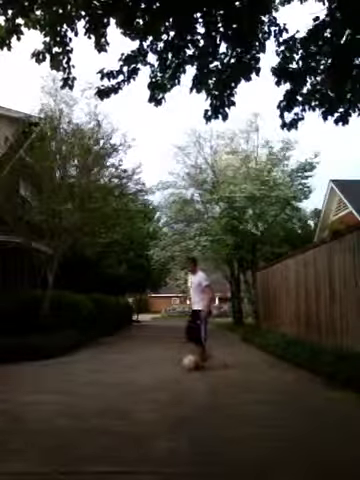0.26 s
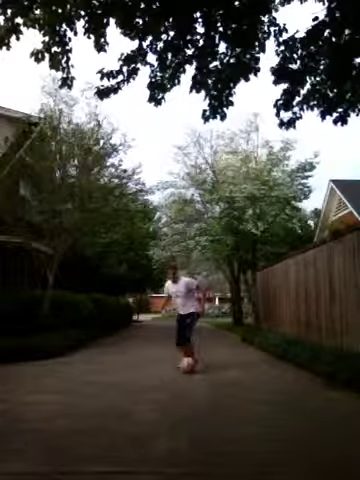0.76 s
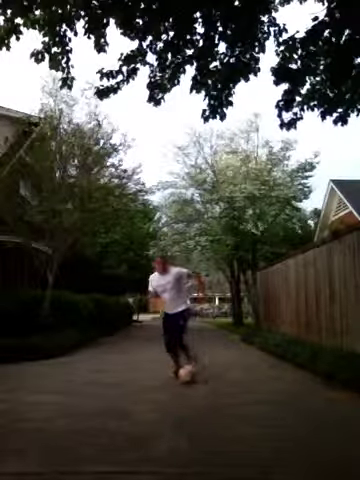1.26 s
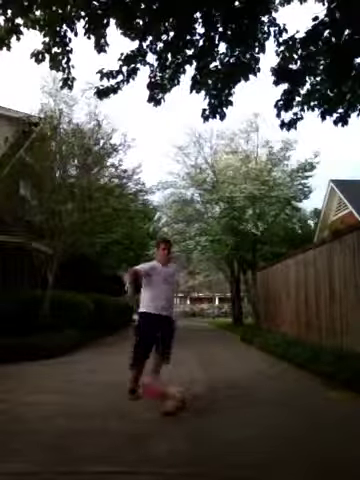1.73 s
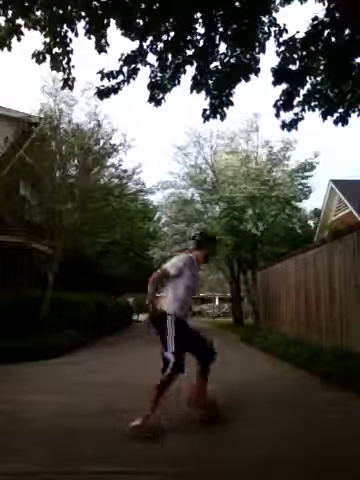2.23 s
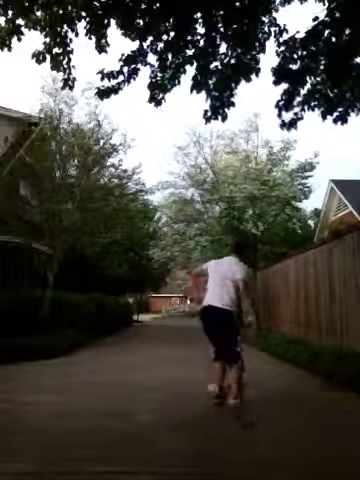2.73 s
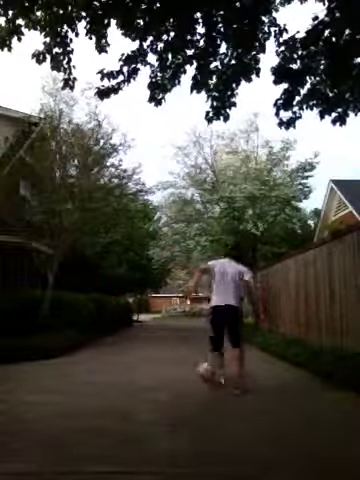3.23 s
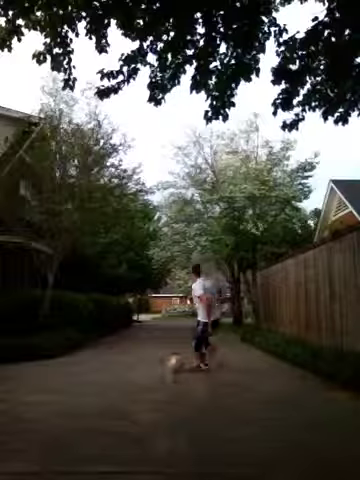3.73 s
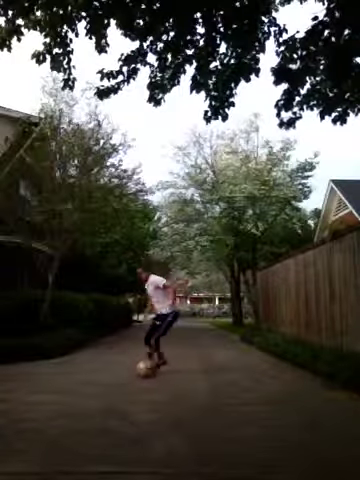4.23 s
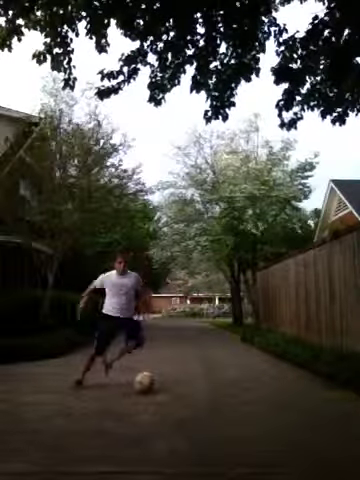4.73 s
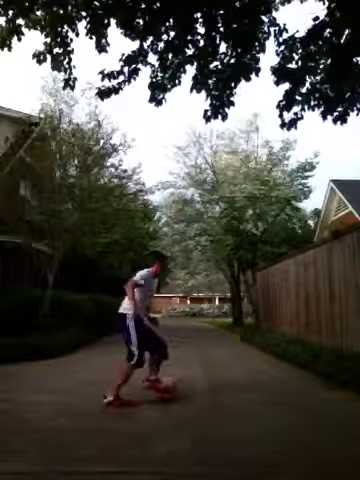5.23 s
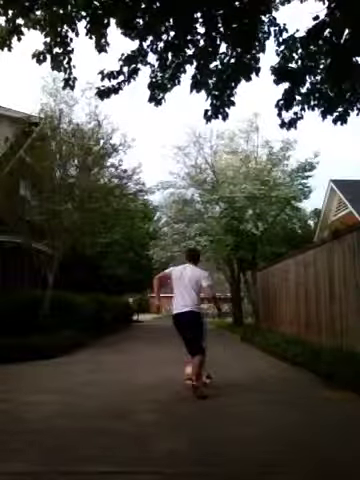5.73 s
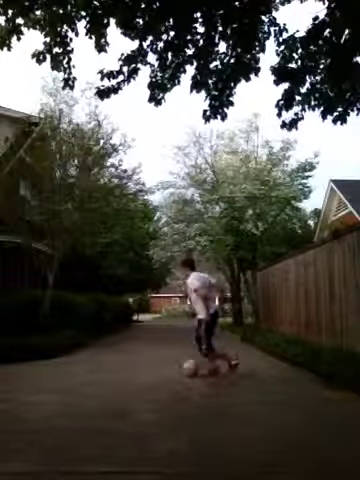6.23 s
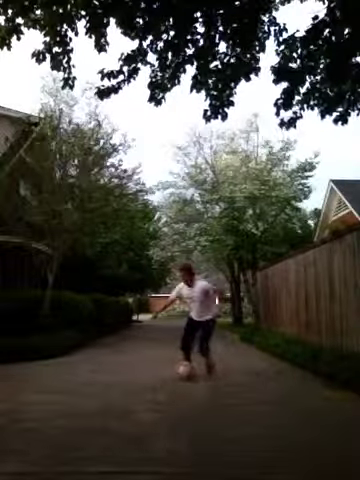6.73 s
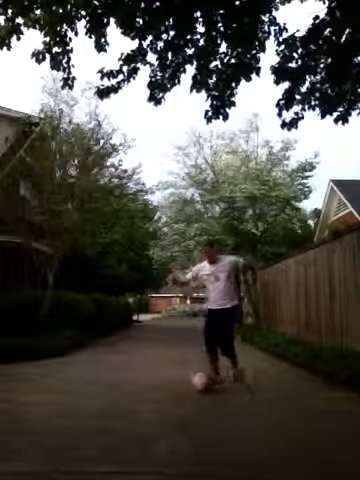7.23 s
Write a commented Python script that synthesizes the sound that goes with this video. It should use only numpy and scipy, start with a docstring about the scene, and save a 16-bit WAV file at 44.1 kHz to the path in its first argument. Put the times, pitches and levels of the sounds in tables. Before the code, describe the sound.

Outdoors on a driveway, a soft steady wash of distant traffic and leaves lies under everything. At about 0.2 s a pebble snaps brightly; faint scuffs and dull ball taps follow until 1.3 s. From 1.4 s footfalls and crisp gritty scrapes quicken, with a small chirp, and a strong hollow ball knock at 1.9 s. A sharp short shoe chirp sounds at 2.1 s, then softer steps and dragging grit. Around 3.6 to 3.9 s come thuds, chirps and a hard skid spraying hissing sand. Ball knocks at 4.5 and 5.0 s mix with firm steps, a thin faint squeal at 4.8 s, a chirp at 5.2 s and sliding scuffs. A solid step lands near 6.2 s; lighter taps follow, ending with ball touch, scrapes and two quick chirps by 7.4 s. Fence and walls echo faintly; the small microphone has thin bass.

```python
"""Short dull thuds of shoes and ball on an asphalt driveway, gritty scuffs, now and then a chirp or squeal.
A player dribbles a soccer ball up and down between a house and a wooden fence.
Thuds are damped modes, scuffs are shaped random clicks, chirps are tone bursts, squeals and sand are noise.
Fence and walls return a faint echo (convolution), over a quiet, steady outdoor wash of noise."""
import sys
import numpy as np
from scipy import signal
from scipy.fft import rfft, irfft
from scipy.io import wavfile

SR = 44100
rng = np.random.default_rng(int(sys.argv[2]) if len(sys.argv) > 2 else 0)


def transcribe(signal):
    """Save signal, clipped to [-1, 1], as a 16-bit WAV file at the path in sys.argv[1]."""
    frames = np.atleast_2d(signal).T
    limited = np.clip(frames, -1, 1)
    pcm = np.round(limited * 32767).astype(np.int16)
    wavfile.write(sys.argv[1], SR, pcm)


N = 328986
TIME = np.arange(N) / SR

# foot taps the ball: (time [s], knock level [dB], slap re knock [dB])
BALL_TOUCHES = [(0.427, -46, -8), (.75, -42.5, -8.5), (0.9304, -38.5, -9), (1.2129, -46.5, -4),
                (1.676, -36.5, -11), (1.8895, -22.5, -22), (2.3561, -30, -18), (2.7148, -38, -4.5),
                (3.6841, -32.5, -6.5), (3.7172, -38.5, -7), (4.5087, -27, -11), (4.9967, -25.5, -22.5),
                (5.003, -35, -6.5), (5.2981, -40.5, -3.5), (5.4244, -38.5, -10), (6.7035, -46.5, -16),
                (6.9644, -39, -11), (7.2665, -34, -2.5)]
# shoe lands: (time [s], knock level [dB], weight re knock [dB], slap re knock [dB])
FOOTFALLS = [(0.4352, -50, 3, -9), (.793, -49.5, -7, 9.5), (1.3499, -46, 10.5, 4.5),
             (1.4353, -32, -8.5, -0.5), (1.6646, -39.5, 4, -12), (1.8389, -36, 3.5, 2),
             (2.096, -36, -4.5, -0.5), (2.122, -33.5, -2, 0.5), (2.2652, -40.5, 3, 5),
             (2.5511, -38.5, -2, 2), (2.7988, -33.5, -0.5, -1), (3.0762, -48, 8.5, 3),
             (3.2174, -37, -1.5, -3), (3.2958, -49.5, 9, 3.5), (3.4792, -42.5, 0, 2), (3.624, -33, -2.5, 1),
             (3.691, -37, 4.5, 1), (3.8505, -32.5, 0.5, -5), (4.0145, -43, 3, -3.5), (4.0811, -36.5, 0, -3),
             (4.3055, -38, 4, 6), (4.318, -47, 13.5, 2), (4.445, -37, -6, 0.5), (4.5504, -46.5, 0, 4),
             (4.7505, -38, -4, -1), (4.9372, -25.5, -2.5, -5), (5.186, -38, -11, -3),
             (5.2065, -37.5, -3.5, 1.5), (5.218, -34.5, 1.5, 1), (5.4334, -44, -17, -4),
             (5.621, -39.5, -8, -4), (5.834, -46, 0, -7), (6.1357, -38.5, 1.5, 5),
             (6.1775, -27.5, -0.5, -9), (6.4125, -43, -0.5, -2.5), (6.6043, -41.5, 2.5, 1.5),
             (7.1879, -46.5, 2.5, -6)]
CONTACT_GAIN_DB = -0.5   # on all knock levels above, in the thuds only


def from_db(db):
    """Decibels to amplitude factor."""
    return 10 ** (np.asarray(db) / 20)


def rms_one(x):
    """The same sound at rms 1."""
    return x / np.sqrt(np.mean(x ** 2) + 1e-20)


def at_hz(points, hz, axis=1):
    """One column of a table, read on a log-frequency axis."""
    points = np.array(points)
    return np.interp(np.log(np.maximum(hz, 1)), np.log(points[:, 0]), points[:, axis])


def coloured(x, spectrum):
    """A steady excitation shaped by a spectrum; rms 1."""
    hz = np.arange(N // 2 + 1) * SR / N
    return rms_one(irfft(rfft(x) * from_db(at_hz(spectrum, hz)), N))


def bandpass(x, low_hz, high_hz):
    """Butterworth band-pass."""
    return signal.sosfilt(signal.butter(2, [low_hz, high_hz], "band", fs=SR, output="sos"), x)


def add(out, s, sound):
    """Mix a sound in from time s on."""
    start = max(round(s * SR), 0)
    out[start:start + len(sound)] += sound[:max(N - start, 0)]


def drift(knots_per_s):
    """A random wander, straight lines between normal draws of spread 1."""
    knots = rng.standard_normal(N // 20)
    return np.interp(TIME * knots_per_s, np.arange(len(knots)), knots)


def grains(per_s, spread_db):
    """Random clicks of uneven size and either sign."""
    sizes = from_db(spread_db * np.minimum(rng.exponential(1, N), 4))
    signs = rng.choice([-1, 1], N)
    return sizes * signs * (rng.random(N) < per_s / SR)


def air(level_db=-54.3):
    """Distant traffic and leaves: a soft, steady wash of shaped noise."""
    # wash spectrum: (frequency [Hz], relative density [dB])
    air_spectrum = [(15, -69), (25, -33), (59, -10), (84, -8.5), (126, -4), (227, -1), (267, -3), (389, -2),
                    (537, -5.5), (703, -4.5), (1080, -12.5), (1170, -10.5), (4500, -24.5), (13900, -28),
                    (15500, -36.5)]
    return from_db(level_db) * coloured(rng.standard_normal(N), air_spectrum)


def strokes(rise_share=0.49):
    """Every rub as (s, dB, rise s, fall s, fine dB, honk dB): brushes, catches of slides, crushes of contacts."""
    # sole brushes grit once:
    # (time [s], grit level [dB], length [s], fine re coarse grit [dB], honky mid band re grit [dB])
    brushes = [(0.039, -58.5, .019, 10, 1), (.115, -61, .015, 7, -8), (0.439, -52, 0.013, 5, 4.5),
               (0.916, -48, 0.013, 12, 10.5), (1.222, -58, 0.011, 6, 6), (1.373, -31.5, 0.018, 7.5, -5.5),
               (1.446, -32.5, .018, 5, 1), (1.507, -42, 0.012, 4.5, 4), (1.582, -36, 0.013, 5, -2.5),
               (1.646, -42.5, .013, 3, 2), (1.707, -50, 0.016, -4, 0.5), (1.768, -52, 0.019, 1, -0.5),
               (1.856, -34.5, .017, 1, -2.5), (1.897, -50.5, .02, 7, 13.5), (1.984, -50.5, 0.011, 2, -3),
               (2.117, -37.5, 0.029, -1, 2.5), (2.561, -40, 0.02, -8.5, 1.5), (2.612, -56, .018, -3, -1),
               (2.754, -55, 0.062, -3, -8), (2.799, -45.5, 0.011, -11, -2.5), (3.015, -56.5, 0.0075, 10, 7),
               (3.385, -54, 0.017, -4.5, 0), (3.486, -49.5, 0.017, 9, 7), (3.64, -38, 0.012, 1.5, 8.5),
               (3.812, -48, 0.012, 2, -3), (3.858, -30, 0.023, 5.5, 4), (4.091, -47, 0.0099, 15, -18),
               (4.107, -39.5, 0.014, 6, 3.5), (4.2, -49.5, 0.015, 1.5, 7.5), (4.309, -53, 0.019, 1, -8),
               (4.671, -54.5, .021, 1, 4.5), (4.705, -54, 0.011, 4, 3), (4.778, -39, 0.031, -1, -0.5),
               (4.82, -48.5, 0.063, -15, -11.5), (4.951, -41.5, .02, 4, -3), (5, -56, .02, 5, 2),
               (5.055, -47.5, .025, 4.5, 3.5), (5.189, -38.5, 0.017, 3, 6),
               (5.214, -36.5, 0.025, -0.5, 2.5), (5.519, -48.5, 0.052, 7, -3.5),
               (5.631, -42.5, 0.016, -4, 3.5), (6.115, -53.5, 0.021, -10, 0.5),
               (6.152, -41.5, 0.011, -2, 5), (6.17, -42, 0.037, -2, 5), (6.331, -51, 0.0063, 2, 12),
               (6.459, -46, 0.017, -1, -0.5), (6.63, -53.5, 0.034, 7, -7), (6.685, -49.5, 0.016, 4, -8),
               (6.75, -42.5, 0.016, 6.5, 4), (6.8, -44, .018, 9, -4.5), (7.189, -44.5, 0.0045, 0, 14.5),
               (7.204, -36.5, 0.018, 12, 3.5), (7.242, -47, 0.036, 1, -7), (7.31, -41, 0.012, 2.5, 3.5),
               (7.374, -42.5, 0.015, 4.5, 5), (7.414, -35, 0.02, 2, 11), (7.432, -35.5, .013, -2, 3.5)]
    # sole slides on, catching repeatedly:
    # (start [s], end [s], catch interval [s], grit level [dB], fine re coarse grit [dB])
    slides = [(0.809, .93, .033, -41.5, 7), (2.325, 2.455, 0.0363, -49, -1), (2.834, 2.96, 0.033, -52, 0),
              (3.243, 3.34, .028, -47, 1.5), (4.51, 4.635, 0.0498, -44, 4), (5.323, 5.475, 0.045, -40, 3)]
    catch_s, catch_honk_db = 0.02, 0.5
    catches = []
    for start, end, every, db, fine_db in slides:
        for s in np.arange(start, end, every):
            catches.append((s, db, catch_s, fine_db, catch_honk_db))
    rubs = [(s, db, rise_share * length, (1 - rise_share) * length, fine_db, honk_db)
            for s, db, length, fine_db, honk_db in brushes + catches]
    # each contact crushes a little grit
    crush_re_slap_db, crush_fine_db, crush_honk_db = -10.5, -4.5, 2
    crush_lag_s, crush_rise_s, crush_fall_s = 0.002, 0.0013, 0.01
    crushes = [(s + crush_lag_s, db + slap_db + crush_re_slap_db,
                crush_rise_s, crush_fall_s, crush_fine_db, crush_honk_db)
               for s, db, *_, slap_db in FOOTFALLS + BALL_TOUCHES]
    return rubs + crushes


def grit_ticks(per_s=9000, spread_db=-0.5, patchy_db=3.5, patches_per_s=110):
    """Grit ticks from three shared click streams, each band swelling and fading in its own patches."""
    ticks = [grains(per_s, spread_db) for _ in range(3)]
    edges_hz = np.geomspace(900, 17000, 17)
    out = np.zeros(N)
    for k, (low, high) in enumerate(zip(edges_hz, edges_hz[1:])):
        band = bandpass(ticks[k % len(ticks)], low, high)
        out += band * from_db(patchy_db * drift(patches_per_s))
    return out


def judder(depth_db=2.04, bumps_per_s=260):
    """A sliding sole bumps over rough asphalt, so its whole sound flutters; gain of rms 1."""
    return rms_one(from_db(depth_db * drift(bumps_per_s)))


def scuffs(rise_shape=1.68, fall_shape=0.86):
    """Each stroke swells and fades: grit crunches, sand hisses, the mid band honks and the heel rumbles."""
    # loose sand under the shoes: (time [s], level re grit before the fineness term [dB])
    loose_sand = [(0, -7), (1.4, -8), (2.1, -9), (2.6, -14), (2.95, -1.5), (3.35, -5.5), (3.65, -6.5),
                  (4.2, -4), (4.9, -5), (5.6, -10.5), (6.15, -1.5), (6.5, -1.5), (6.8, -12), (7.46, -11)]
    # spectra of the five parts: (frequency [Hz], relative density [dB])
    coarse_spectrum = [(900, -16), (1950, -5.5), (2550, 6.5), (3100, 4), (4000, 0.5), (5000, -20),
                       (8000, -62)]
    fine_spectrum = [(3000, -31), (4300, 2.5), (5000, 2.5), (5900, 5.5), (7200, 0), (8400, 0.5),
                     (9600, -12.5), (15000, -74)]
    sand_spectrum = [(6000, -36), (8500, 0.5), (9800, -5.5), (11300, -1), (12500, -2.5), (14000, -7),
                     (15500, -7)]
    honk_spectrum = [(700, -37), (1030, -13.5), (1280, -8.5), (1450, -2), (1650, -6), (1950, -15.5),
                     (2800, -37)]   # near 1.4 kHz, probably the microphone ringing
    drag_spectrum = [(60, -21), (150, -13.5), (280, -4), (400, -3.5), (520, 2.5), (660, -4.5), (790, 4.5),
                     (980, -10.5), (1600, -49.5)]
    # light strokes skim fine grit and sand; pressed ones grind coarse grit and drag the heel
    sand_per_fine, drag_base_db, drag_per_fine, drag_per_honk = 0.45, -6.5, -0.81, 0.85

    power = np.zeros((5, N))
    for s, db, rise, fall, fine_db, honk_db in strokes():
        near = slice(max(int(s * SR) - SR // 10, 0), int(s * SR) + SR // 7)
        t = TIME[near] - s
        # half height one rise before and one fall after the top
        halvings = np.where(t < 0, np.abs(t / rise) ** rise_shape, np.abs(t / fall) ** fall_shape)
        stroke = 0.5 ** halvings
        sand_db = np.interp(s, *np.transpose(loose_sand)) + sand_per_fine * fine_db
        drag_db = drag_base_db + drag_per_fine * fine_db + drag_per_honk * honk_db
        coarse_share = 1 / (1 + from_db(fine_db) ** 2)
        shares = [coarse_share, 1 - coarse_share, *from_db([sand_db, honk_db, drag_db]) ** 2]
        power[:, near] += np.outer(shares, (from_db(db) * stroke) ** 2)
    coarse, fine, sand, honk, drag = np.sqrt(power)

    ticks = grit_ticks()
    clicks = grains(per_s=6000, spread_db=2.0)
    return (coarse * coloured(ticks, coarse_spectrum)
            + from_db(-1.07) * fine * coloured(ticks, fine_spectrum)
            + from_db(-2.5) * sand * coloured(ticks, sand_spectrum)
            + from_db(-0.5) * honk * coloured(clicks, honk_spectrum)
            + from_db(3.0) * drag * coloured(clicks, drag_spectrum))


def reflections(build_s=0.011, echo_cut_hz=5000, path_spread=0.1):
    """The driveway's answer from one spot: a few dull echoes and a thin tail with its own decay per band."""
    # ground, fence and house, before the path spread: (delay [s], level [dB])
    echoes = [(.0042, -12), (0.0119, -15), (.029, -25), (.047, -20)]
    # scatter between walls and trees: (frequency [Hz], level [dB], t60 [s])
    scatter = [(121, -8, 0.43), (392, -16, 0.39), (1380, -14, 0.51), (3800, -8.5, 0.45), (8900, -13, 0.38),
               (15000, -4, 0.14)]
    t = TIME[:SR * 3 // 5]
    tail = np.zeros(len(t))
    edges_hz = np.geomspace(70, 17000, 13)
    for low, high in zip(edges_hz, edges_hz[1:]):
        hz = np.sqrt(low * high)
        fade = from_db(-60 * t / at_hz(scatter, hz, axis=2)) * (1 - np.exp(-t / build_s))
        band = bandpass(rng.standard_normal(len(t)), low, high)
        tail += from_db(at_hz(scatter, hz)) * band * fade / np.sqrt(np.sum(fade ** 2))
    taps = np.zeros(len(t))
    for delay, db in echoes:
        path = np.exp(path_spread * rng.uniform(-1, 1))
        taps[round(delay * path * SR)] += from_db(db)
    return tail + signal.sosfilt(signal.butter(1, echo_cut_hz, fs=SR, output="sos"), taps)


def driveway(x, count=14):
    """The player keeps moving, so each of count equal stretches is convolved with reflections of its own."""
    out, start = np.zeros(N), 0
    for stretch in np.array_split(x, count):
        add(out, start / SR, signal.fftconvolve(stretch, reflections()))
        start += len(stretch)
    return out


def snap(s=0.1637, db=-3, low_hz=2500, high_hz=7300, skips_s=(0.00013, 0.00031, 0.00074)):
    """A pebble shoots out from under the sole: one bright band-passed crack, spread over a few tiny skips."""
    click = np.full(N, 1e-18)   # tiny offset instead of silence
    click[round(s * SR)] = from_db(db)
    for skip in skips_s:
        loop = np.r_[1, np.zeros(round(skip * SR)), 0.5]
        click = signal.lfilter(loop[::-1], loop, click)   # all-pass: longer, not coloured
    return bandpass(click, low_hz, high_hz)


def struck(modes, pitch_hz, t, contact_s, detune=0.037, vary_db=2.5):
    """Damped modes, a little different at each blow; rms 1 over the first 6 ms."""
    out = np.zeros(len(t))
    for (multiple, db, t60), (shift, strength) in zip(modes, rng.standard_normal((len(modes), 2))):
        hz = pitch_hz * multiple * (1 + detune * shift)
        out += from_db(db + vary_db * strength - 60 * t / t60) * np.sin(2 * np.pi * hz * t)
    out = out * (1 - np.exp(-t / contact_s))   # soft rubber builds up its push gradually
    return out / np.sqrt(np.mean(out[:round(0.006 * SR)] ** 2))


def thud(db, weight_db, slap_db, weight_hz, knock_hz):
    """Low push, hollow knock and surface slap; the rest of the sole or ball settles just after."""
    # modes: (multiple of pitch, relative level [dB], t60 [s]), level and pitch varied at each blow
    weight_modes = [(.64, -10.5, 0.033), (1, 6, 0.023)]
    knock_modes = [(.92, 9.5, 0.019), (1.12, 4, 0.011), (1.42, -6, 0.019)]
    slap_modes = [(.83, -6, 0.018), (1, 15, 0.014), (1.16, 0, 0.018)]
    t = TIME[:SR // 10]
    slap_hz = 1366 * np.exp(0.045 * rng.standard_normal())
    push = from_db(weight_db) * struck(weight_modes, weight_hz, t, contact_s=0.007)
    knock = struck(knock_modes, knock_hz, t, contact_s=0.00058)
    slap = from_db(slap_db) * struck(slap_modes, slap_hz, t, contact_s=0.00076)
    settle = from_db(-7) * knock + from_db(-4) * slap
    settle_s = 0.004037 * rng.uniform(0.755, 1.319)
    late = np.interp(t - settle_s, t, settle, left=0)
    return from_db(db) * (knock - push + slap + late)


def ball(weight_db=-4, weight_hz=314, knock_hz=585):
    """Hollow taps on the ball, which differ in strength and in how sharply the shoe slaps it."""
    out = np.zeros(N)
    for s, db, slap_db in BALL_TOUCHES:
        add(out, s, thud(db + CONTACT_GAIN_DB, weight_db, slap_db, weight_hz, knock_hz))
    return out


def footfalls(weight_hz=291.2, sag_hz_per_db=5, knock_hz=620):
    """Shoes land on asphalt; a heavier landing has a stronger, lower push."""
    out = np.zeros(N)
    for s, db, weight_db, slap_db in FOOTFALLS:
        push_hz = weight_hz - sag_hz_per_db * weight_db
        add(out, s, thud(db + CONTACT_GAIN_DB, weight_db, slap_db, push_hz, knock_hz))
    return out


def chirps():
    """A sole that grips hard judders for a few regular cycles: short sine bursts."""
    # (time [s], pitch [Hz], rms level at the top [dB], time from top to half height [s])
    bursts = [(1.445, 1430, -25, 0.0031), (2.107, 1405, -16, 0.002), (3.6415, 1450, -27, 0.0024),
              (3.855, 1597, -23, 0.0053), (5.194, 1343, -21, 0.0021), (7.409, 1323, -21, 0.0015),
              (7.419, 1380, -22.5, 0.0038)]
    out = np.zeros(N)
    t = TIME[:SR // 20] - 1 / 40
    for s, hz, db, half_s in bursts:
        envelope = from_db(db) * np.sqrt(2) * 0.5 ** ((t / half_s) ** 2)
        add(out, s + t[0], envelope * np.sin(2 * np.pi * hz * t))
    return out


def spray(at_s=3.838, level_db=-24, attack_s=0.002, hold_s=0.013, half_life_s=0.0065):
    """Sand thrown by one hard skid hisses: quick attack, level until hold_s after the start, then decay."""
    # flying sand: (frequency [Hz], relative density [dB])
    spray_spectrum = [(3000, -18), (6000, -14), (8300, -7), (9800, -3), (11300, 4), (13000, -7),
                      (15500, -17)]
    t = TIME - at_s
    attack = np.clip(t / attack_s, 0, 1)
    decay = 0.5 ** (np.maximum(t - hold_s, 0) / half_life_s)
    return from_db(level_db) * attack * decay * coloured(rng.standard_normal(N), spray_spectrum)


def squeals(width_hz=220):
    """A dragged sole slips fast and unevenly: a thin, rough whistle of narrow-band noise."""
    # (time [s], pitch [Hz], level at the top [dB], time from top to half height [s])
    whistles = [(4.792, 2130, -44, 0.021), (5.27, 3900, -51, 0.037)]
    out = np.zeros(N)
    for s, hz, db, half_s in whistles:
        peak = signal.iirpeak(hz, hz / width_hz, fs=SR)
        whistle = rms_one(signal.lfilter(*peak, rng.standard_normal(N)))
        out += from_db(db) * 0.5 ** (((TIME - s) / half_s) ** 2) * whistle
    return out


def scene(squeak_send_db=-7):
    """The player in the driveway, with its echoes, over the background."""
    steps = ball() + footfalls() + scuffs() * judder() + spray() + snap()
    squeaks = chirps() + squeals()
    echoes = driveway(steps + from_db(squeak_send_db) * squeaks)
    return (steps + squeaks + echoes + air())[None]


def record(dry):
    """A small microphone: thin bass, two dips in the middle, the top cut off."""
    # response dips: (frequency [Hz], width [Hz], depth [dB])
    mic_dips = [(966, 275, -2.5), (1927, 610, -1)]
    out = signal.sosfilt(signal.butter(3, 100, "high", fs=SR, output="sos"), dry)
    for hz, width, db in mic_dips:
        out = out + (from_db(db) - 1) * signal.lfilter(*signal.iirpeak(hz, hz / width, fs=SR), out)
    cutoff_hz = 15500
    return signal.sosfilt(signal.ellip(12, 0.1, 80, cutoff_hz, fs=SR, output="sos"), out)


dry = scene()
out = record(dry)
transcribe(out)
```